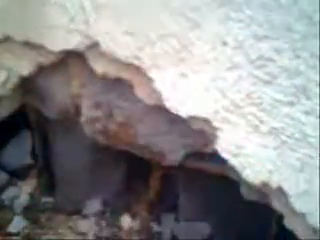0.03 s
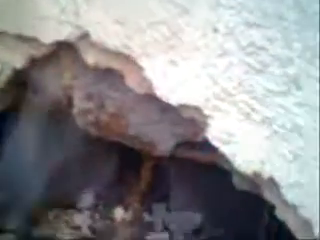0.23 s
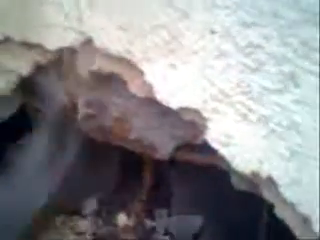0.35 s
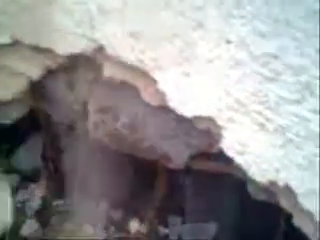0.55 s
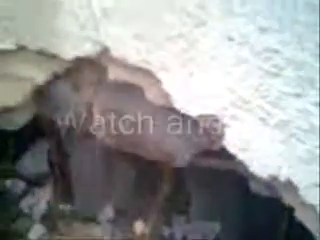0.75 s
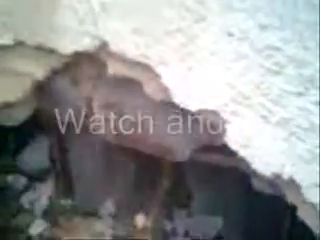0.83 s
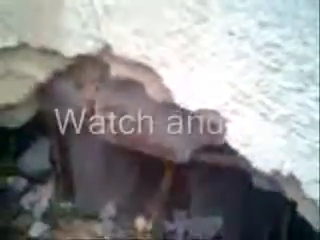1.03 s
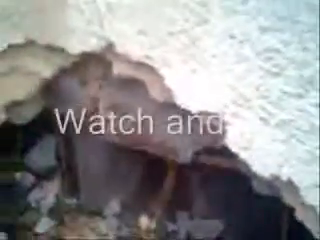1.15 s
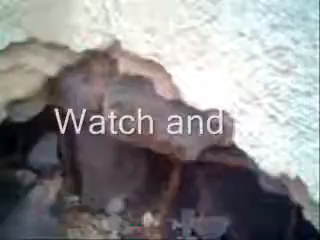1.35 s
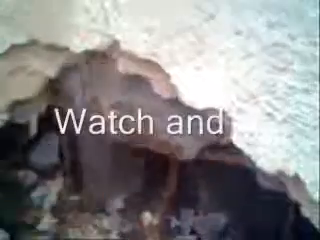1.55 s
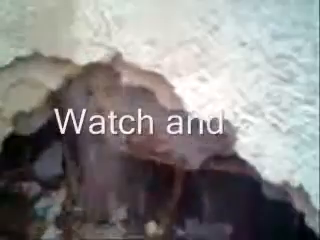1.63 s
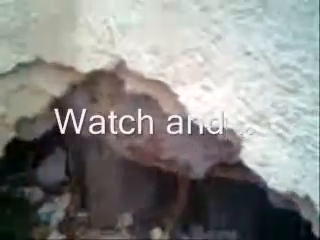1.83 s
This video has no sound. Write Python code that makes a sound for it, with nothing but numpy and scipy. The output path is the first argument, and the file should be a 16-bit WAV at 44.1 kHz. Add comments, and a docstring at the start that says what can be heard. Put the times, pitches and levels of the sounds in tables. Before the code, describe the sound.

Two heavy tool blows thud into concrete, cracking and crumbling it. Small chips fall on rubble between and after the hits, and grit slides down at the end, over faint outdoor air through a muffled, low-quality microphone.

```python
"""Grit trickles over outdoor air and a faint wavering hum. At 0.2 s a heavy tool strikes a broken concrete
edge: the slab rings, cracks and crunches, the tool thuds and jars as it bites, the surroundings rumble.
Chips tick onto the rubble. A second blow at 1.3 s slips and bites again; more chips fall, and from 1.8 s
grit scrapes down the wall. A narrow-band recorder dulls everything and adds a thin, gritty treble."""
import sys
import numpy as np
from scipy import signal
from scipy.fft import rfft, irfft
from scipy.io import wavfile

SR = 44100
rng = np.random.default_rng(int(sys.argv[2]) if len(sys.argv) > 2 else 0)


def materialize(psi):
    """Save the field psi as 16-bit PCM at rate SR to the path in sys.argv[1].

    A 1-D psi becomes a single channel; in a 2-D psi each row is a channel.
    """
    bounded = np.clip(np.atleast_2d(psi).T, -1, 1)
    quanta = np.round(bounded * 32767).astype(np.int16)
    wavfile.write(sys.argv[1], SR, quanta)


N = 83790
T = np.arange(N) / SR


def undb(db):
    """Decibels to gain."""
    return 10 ** (np.asarray(db) / 20)


def unit_rms(x):
    """Scale to rms 1."""
    return x / np.sqrt(np.mean(x ** 2))


def gain_curve(points):
    """Gain over time from (t/s, level/dB) points."""
    return undb(np.interp(T, *np.array(points).T))


def colour(x, spectrum):
    """Shape noise by (f/Hz, level/dB) points; rms 1."""
    hz, db = np.array(spectrum).T
    bins_hz = np.maximum(np.fft.rfftfreq(N, 1 / SR), 1)
    gain = undb(np.interp(np.log(bins_hz), np.log(hz), db))
    return unit_rms(irfft(rfft(x) * gain, N))


def resonate(x, hz, width_hz):
    """One resonance; rms 1."""
    return unit_rms(signal.lfilter(*signal.iirpeak(hz, hz / width_hz, fs=SR), x))


def envelope(start_s, attack_s, t60_s, hold_s=0):
    """Linear rise, hold, exponential fall."""
    age_s = T - start_s
    rise = np.clip(age_s / attack_s, 0, 1)
    return rise * np.exp(-np.log(1000) * np.clip((age_s - attack_s - hold_s) / t60_s, 0, 10))


def ring(start_s, hz, attack_s, t60_s, hold_s=0):
    """One struck mode."""
    return envelope(start_s, attack_s, t60_s, hold_s) * np.sin(2 * np.pi * hz * (T - start_s))


def noise():
    """White noise."""
    return rng.standard_normal(N)


def grains(per_s):
    """Dense clicks of random size."""
    return noise() * (rng.random(N) < per_s / SR)


def drift(rate_hz):
    """Slow random drift, spread near 1."""
    knots = rng.standard_normal(256)
    return np.interp(T * rate_hz, np.arange(len(knots)), knots)


# air spectrum: f/Hz, level/dB
AIR_SPECTRUM = [(25, -24), (60, -9), (110, -1.5), (200, -0.5), (320, 0), (600, -5), (1200, -6),
                (2000, -26.5), (3500, -15.5), (12000, -34)]
# air envelope: t/s, level/dB
AIR_LEVEL = [(0, -53.5), (0.18, -48.5), (0.4, -56), (0.95, -56), (1.15, -56.5), (1.3, -50), (1.6, -51),
             (1.9, -52.5)]

def air():
    """Outdoor air: low noise, slowly swelling."""
    return gain_curve(AIR_LEVEL) * colour(noise(), AIR_SPECTRUM)


# hum envelope: t/s, level/dB
HUM_LEVEL = [(0, -56.5), (0.08, -56.5), (0.14, -62), (0.42, -76), (0.5, -43.5), (0.58, -71.5), (0.72, -69),
             (0.79, -58.5), (0.87, -81), (1.02, -58), (1.25, -61), (1.58, -57), (1.68, -71), (1.76, -53),
             (1.9, -63)]

def hum(pitch_hz=141.2, wander_hz=2.33, waver_db=3.5):
    """A low tone wavers in pitch and level."""
    phase = 2 * np.pi * np.cumsum(pitch_hz + wander_hz * drift(20)) / SR
    return unit_rms(np.sin(phase)) * gain_curve(HUM_LEVEL) * undb(waver_db * drift(15.7))


GRIT_GRAINS_PER_S = 5000
# grit spectrum: f/Hz, level/dB
GRIT_SPECTRUM = [(300, -30), (900, -12.5), (1400, -6.5), (1900, 1), (2500, -4), (3100, -3.5), (3800, -6),
                 (12000, -28)]
# trickle envelope: t/s, level/dB
TRICKLE_LEVEL = [(0.0, -50), (0.06, -45), (0.17, -53.5), (0.36, -56.5), (0.47, -58.5), (0.53, -49.5),
                 (0.58, -49.5), (0.62, -46), (0.72, -49.5), (0.81, -47.5), (0.93, -52), (1.05, -52),
                 (1.17, -60), (1.27, -51.5), (1.45, -55.5), (1.58, -52.5), (1.68, -50.5), (1.9, -40)]
# slide envelope: t/s, level/dB
SLIDE_LEVEL = [(1.62, -90), (1.72, -81), (1.78, -49), (1.815, -37.5), (1.845, -36), (1.87, -35),
               (1.9, -37.5)]
# slide resonances: f/Hz, width/Hz, level/dB
SLIDE_RESONANCES = [(424, 530, -6), (1940, 300, 0), (2310, 150, 4)]

def grit(flicker_db=1.5):
    """Fine grit trickles throughout, then slides down the wall, scraping."""
    trickle = colour(grains(GRIT_GRAINS_PER_S), GRIT_SPECTRUM) * gain_curve(TRICKLE_LEVEL)
    scrape = 0
    for hz, width_hz, db in SLIDE_RESONANCES:
        band = resonate(grains(GRIT_GRAINS_PER_S), hz, width_hz)
        scrape += undb(db) * resonate(band, hz, width_hz=hz)
    slide = unit_rms(scrape) * gain_curve(SLIDE_LEVEL)
    return (trickle + slide) * undb(flicker_db * drift(70))


# tool blows: t/s, slab level/dB, crunch level/dB, rumble level/dB, rumble t60/s
BLOWS = [(0.2072, -10, -17.5, -30.5, 0.49), (1.3235, -10.5, -22, -35, 0.49)]
# slab modes: f/Hz, relative level/dB, t60/s
SLAB_MODES = [(150.9, -32.5, 0.74), (200.6, -23, 0.51), (250.8, -22.5, 0.3), (369.7, -7, 0.15),
              (537, -18, 0.037), (822, -26, 0.11)]
# crumbling concrete: f/Hz, level/dB
CRUNCH_SPECTRUM = [(30, -17), (70, -16.5), (150, 1.5), (400, 4.5), (900, 1), (1500, -7), (2000, -13.5),
                   (2600, -17), (3500, -6), (12000, -21)]
# response of the surroundings: f/Hz, level/dB
RUMBLE_SPECTRUM = [(30, -32), (80, -10), (190, 0), (330, -10), (600, -19.5), (1400, -17), (2500, -18.5),
                   (3500, -14.5), (12000, -36)]

def blows():
    """Each blow rings the slab, crumbles concrete and sets the surroundings rumbling."""
    crunch = colour(grains(per_s=2500), CRUNCH_SPECTRUM)
    rumble = colour(noise(), RUMBLE_SPECTRUM)
    out = 0
    for start_s, slab_db, crunch_db, rumble_db, rumble_t60_s in BLOWS:
        for hz, db, t60_s in SLAB_MODES:
            out += undb(slab_db + db) * ring(start_s, hz, attack_s=0.006, t60_s=t60_s)
        out += undb(crunch_db) * crunch * envelope(start_s, attack_s=0.0016, hold_s=0.0094, t60_s=0.15)
        out += undb(rumble_db) * rumble * envelope(start_s, attack_s=0.029, t60_s=rumble_t60_s)
    return out


SNAP_ATTACK_S = 0.00085

def snap(start_s, hz, t60_s, splinter_db):
    """Stone on stone: a short ring and a burst of splinters around its pitch."""
    splinters = resonate(noise(), hz, width_hz=hz) * envelope(start_s, SNAP_ATTACK_S, 1.57 * t60_s)
    return ring(start_s, hz, SNAP_ATTACK_S, t60_s) + undb(splinter_db) * splinters


# fractures: t/s, level/dB, f/Hz, t60/s
CRACKS = [(0.2072, -6.5, 840, 0.0049), (0.209, -11.5, 1610, 0.027), (0.2245, -15, 833, 0.016),
          (0.2356, -15.5, 1488, 0.039), (0.2446, -9, 1080, 0.0073), (0.2492, -14, 597, 0.014),
          (0.309, -30, 710, 0.0062), (1.3203, -17.5, 720, 0.012), (1.3228, -11, 963, 0.016),
          (1.3268, -21.5, 2410, 0.015), (1.3402, -13.5, 940, 0.015), (1.3555, -29, 700, 0.013),
          (1.379, -23, 350, 0.02)]

def cracks():
    """The concrete gives way in a few sharp steps."""
    return sum(undb(db) * snap(start_s, hz, t60_s, splinter_db=-10) for start_s, db, hz, t60_s in CRACKS)


# tool bites: t/s, level/dB, f/Hz, contact/s
THUDS = [(0.2103, -7, 286.8, 0.01898), (1.3265, -10.5, 319.5, 0.0051), (1.3369, -10.5, 300.4, 0.0081)]

def thuds(attack_s=0.0018, t60_s=0.016):
    """A low shudder holds as long as the tool bites."""
    return sum(undb(db) * ring(start_s, hz, attack_s, t60_s, hold_s=contact_s - attack_s)
               for start_s, db, hz, contact_s in THUDS)


# pressure spikes: t/s, level/dB
JOLTS = [(0.2111, -4), (0.2255, 1), (0.2462, -18), (1.3243, -8), (1.328, -22), (1.3420, -3.5)]

def jolts(tau_s=0.00027):
    """Steel jars on hard aggregate: sharp spikes with a shallow recoil on both sides."""
    out = 0
    for peak_s, db in JOLTS:
        spike = 2 * np.exp(-np.abs(T - peak_s) / tau_s)
        recoil = np.exp(-np.abs(T - peak_s) / (2 * tau_s))
        out += undb(db) * (spike - recoil)
    return out


# chip landings: t/s, level/dB, f/Hz, t60/s, relative splinter level/dB
CHIPS = [(0.379, -39, 2610, 0.024, -14), (0.5059, -19.5, 2250, 0.002, -11), (0.509, -32, 2450, 0.01, -4.5),
         (0.518, -34, 1700, 0.0097, -16), (0.6094, -42, 2480, 0.025, 6.5),
         (0.614, -35.5, 1730, 0.011, -0.5), (0.64, -25, 2655, 0.014, 0), (0.6411, -21, 1124, 0.0058, -13),
         (0.6548, -28, 980, 0.0068, -4), (0.6580, -27, 1420, 0.0064, 0), (0.677, -31.5, 2500, 0.02, -1.5),
         (0.689, -38.5, 2270, 0.02, 0.5), (0.8381, -16.5, 2188, 0.016, -35), (1.2293, -39, 1270, 0.004, -2),
         (1.5201, -22, 1850, 0.0017, -15), (1.5225, -34.5, 2313, 0.042, -4), (1.5596, -43, 1090, 0.012, 6),
         (1.633, -40, 2580, 0.014, 0), (1.6375, -29.5, 2730, 0.018, -22), (1.6392, -30, 1870, 0.013, -7),
         (1.824, -28.5, 454, 0.017, -12), (1.867, -26, 2350, 0.067, -17)]

def chips(stir_db=-25.5):
    """Each chip ticks on the rubble and stirs a little grit."""
    loose_grit = colour(grains(GRIT_GRAINS_PER_S), GRIT_SPECTRUM)
    out = 0
    for start_s, db, hz, t60_s, splinter_db in CHIPS:
        stirred = undb(stir_db) * loose_grit * envelope(start_s, SNAP_ATTACK_S, t60_s=0.19)
        out += undb(db) * (snap(start_s, hz, t60_s, splinter_db) + stirred)
    return out


def scene():
    """All sources at one microphone."""
    strikes = blows() + cracks() + thuds() + jolts()
    debris = chips() + grit()
    return (strikes + debris + hum() + air())[None]


def record(dry, low_cut_hz=43, band_hz=3088, clock_hz=8000, top_hz=12900, drive=0.77):
    """A narrow-band recorder rounds peaks; its stepped output mirrors sound into the treble and fizzes."""
    image_db, fizz_db, leak_db = -18, -24, -22
    wide = signal.sosfilt(signal.butter(2, low_cut_hz, "high", fs=SR, output="sos"), dry[0])
    narrow = signal.sosfiltfilt(signal.butter(6, band_hz, fs=SR, output="sos"), wide)
    rounded = np.tanh(drive * narrow) / drive
    stepped = np.interp(np.floor(T * clock_hz) / clock_hz, T, rounded)
    fizz = np.gradient(rounded) * resonate(noise(), clock_hz, width_hz=4000)  # follows the wave's slope
    out = rounded + undb(image_db) * (stepped - rounded) + undb(fizz_db) * fizz + undb(leak_db) * wide
    return signal.sosfilt(signal.ellip(10, .2, 80, top_hz, fs=SR, output="sos"), out)[None]


dry = scene()
out = record(dry)
materialize(out)
```